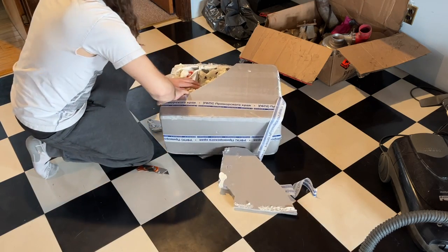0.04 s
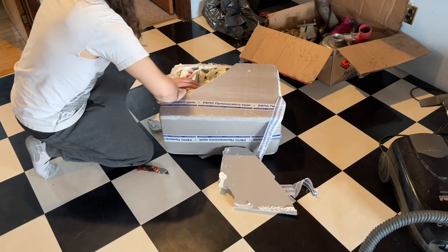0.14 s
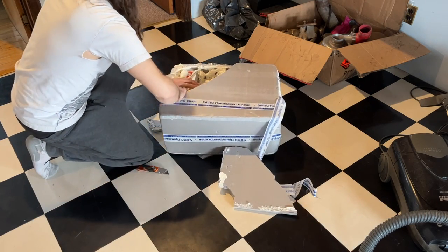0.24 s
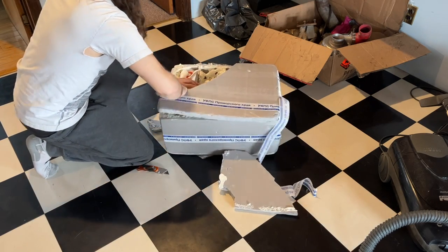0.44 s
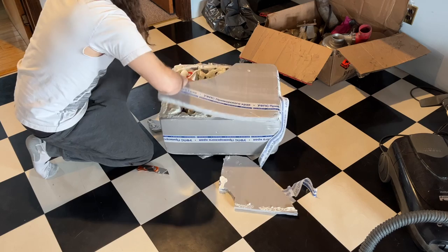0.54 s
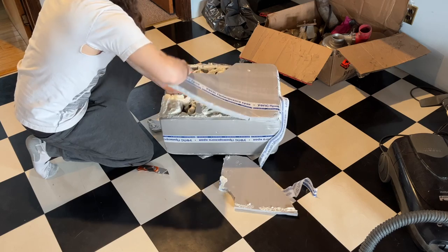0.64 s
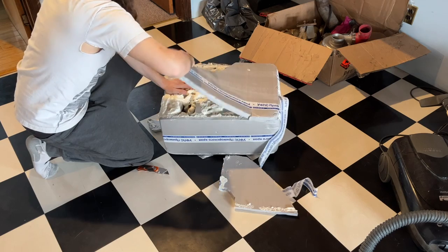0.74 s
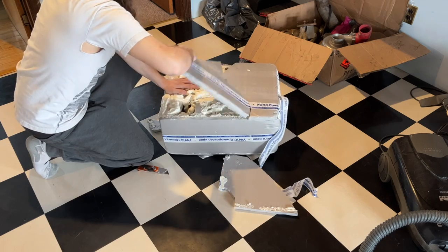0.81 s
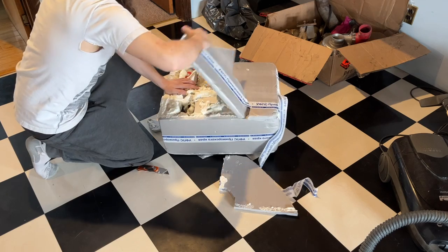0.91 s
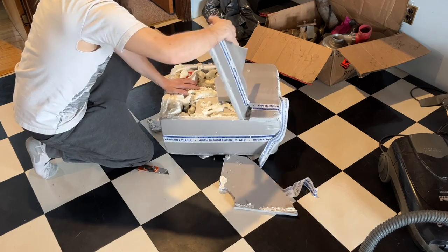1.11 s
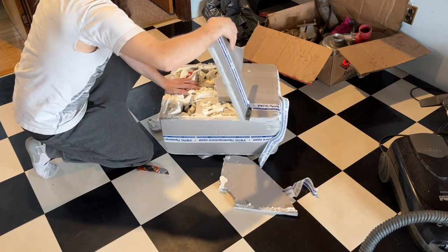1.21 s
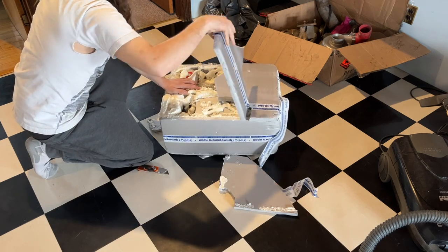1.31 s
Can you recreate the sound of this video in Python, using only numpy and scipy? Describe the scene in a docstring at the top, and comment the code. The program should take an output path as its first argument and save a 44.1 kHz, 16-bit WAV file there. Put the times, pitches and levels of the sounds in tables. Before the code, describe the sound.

Hard packing foam cracking and tearing apart by hand, with creaks and thuds, in a small room

```python
"""Over faint low background noise, a slab of hard packing foam is scuffed, then pried off its block by hand.
It creaks as noise grains, cracks as short noise bursts that ring slab modes, and gives way with a swung thud.
It tears in a run of cracks over clumped bead grains and single pops, and snaps free with a second thud.
Then it rubs, scuffs and squeaks faintly as it is lifted: friction grains, partly through resonances.
A small hard-floored room, made of decaying noise bands and one low mode, rings on after every crack."""
import sys
import numpy as np
from scipy import signal
from scipy.fft import rfft, irfft, next_fast_len
from scipy.io import wavfile

SR = 44100
rng = np.random.default_rng(int(sys.argv[2]) if len(sys.argv) > 2 else 0)


def store_pcm(level_fs):
    """Save levels as 16-bit WAV."""
    pcm = np.round(np.clip(level_fs, -1, 1) * 32767).astype(np.int16)
    wavfile.write(sys.argv[1], SR, np.atleast_2d(pcm).T)


N = 59535
T = np.arange(N) / SR  # s


def amp(db):
    """Decibels to gain."""
    return 10 ** (np.asarray(db) / 20)


def unit(x):
    """Scale to rms 1."""
    return x / np.sqrt(np.mean(x ** 2) + 1e-20)


def level(curve):
    """Gain over time from (t/s, level/dB) points; silent outside them."""
    t_s, db = np.transpose(curve)
    return amp(np.interp(T, t_s, db, left=-np.inf, right=-np.inf))


def colour(x, points):
    """Causal (minimum-phase) filter along (f/Hz, level/dB) points; keeps the power of white noise."""
    size = 2 * next_fast_len(N)
    hz, db = np.transpose(points)
    log_hz = np.log(np.arange(size // 2 + 1) * SR / size + 1)
    gain = amp(np.interp(log_hz, np.log(hz), db))
    cepstrum = irfft(np.log(unit(gain)))
    # fold the cepstrum onto positive time
    cepstrum[1:size // 2] *= 2
    cepstrum[size // 2 + 1:] = 0
    response = np.exp(rfft(cepstrum))
    return irfft(rfft(x, size) * response)[..., :N]


def convolve(x, responses):
    """Play a sound through one impulse response per channel."""
    return np.array([signal.fftconvolve(x, r)[:N] for r in responses])


def ring(x, hz, t60_s):
    """Two-pole resonator: a unit click sets a tone of height 1 ringing."""
    radius = amp(-60 / (t60_s * SR))
    w = 2 * np.pi * hz / SR
    return signal.lfilter([.5, 0, -.5], [1, -2 * radius * np.cos(w), radius ** 2], x + 1e-18)


def resonate(x, hz, q):
    """The part of a sound that a resonance picks out."""
    return signal.lfilter(*signal.iirpeak(hz, q, fs=SR), x + 1e-18)


def swell(start_s, peak_s, sharpness=2):
    """Envelope that starts at start_s, reaches 1 after peak_s and dies away."""
    u = np.maximum(T - start_s, 0) / peak_s
    return (u * np.exp(1 - u)) ** sharpness


def grains(per_s, spread_db):
    """Random clicks of uneven size, rms 1."""
    sizes = amp(spread_db * np.minimum(rng.exponential(1, N), 3))
    signs = rng.choice([-1, 1], N)
    hits = rng.random(N) < per_s / SR
    return unit(sizes * signs * hits)


def clumps(length_s, spread_db):
    """Irregular gain as the foam sticks and gives, rms 1."""
    wander = np.interp(T / length_s, np.arange(N), rng.standard_normal(N))
    return unit(amp(spread_db * wander))


# background spectrum: (f/Hz, level/dB), relative
FLOOR_SPECTRUM = [(20, -16), (50, 6), (75, -1.5), (103, 9), (140, -1.5), (195, 2), (300, -12), (1000, -9),
                  (4000, -67), (16000, -61)]
FLOOR_DB, FLOOR_WIDTH = -52.5, 0.55


def background():
    """Steady coloured noise: one part common to both channels, one part separate in each."""
    air = rng.standard_normal((3, N))
    return amp(FLOOR_DB) * colour(air[0] + FLOOR_WIDTH * air[1:], FLOOR_SPECTRUM)


# room reverberation bands: (f/Hz, t60/s, level/dB, left-right likeness before clipping to -1..1)
ROOM_BANDS = [(60, 0.43, -6, 0.77), (130, 0.31, -3, 1), (315, 0.37, -4, 0.61), (480, 0.33, 0.5, -0.085),
              (1170, 0.45, 0.5, -0.39), (2060, 0.4, -5, -0.087), (4000, 0.44, 2.96, 0.19),
              (7300, 0.27, 1.5, -0.067), (7670, 0.24, 9.5, -1.5), (10300, 0.46, -10, -1.12),
              (13000, 0.32, -8, 1), (14900, .2, -30, -1.2)]
ROOM_GAP_S, ROOM_BUILD_S = 0.00033, 0.0037
BOOM_HZ, BOOM_T60_S, BOOM_DB = 102, 1, -65


def room(x):
    """Diffuse reflections that die band by band, and one low standing wave between the walls."""
    centres_hz, t60s_s, levels_db, likeness = np.transpose(ROOM_BANDS)
    log_hz = np.log(np.fft.rfftfreq(N, 1 / SR) + 1)
    mid, side = rfft(rng.standard_normal((2, N)))
    alike = np.interp(log_hz, np.log(centres_hz), np.clip(likeness, -1, 1))
    noise = np.sqrt((1 + alike) / 2) * mid + np.sqrt((1 - alike) / 2) * side * [[1], [-1]]
    build = np.clip((T - ROOM_GAP_S) / ROOM_BUILD_S, 0, 1)
    response = 0
    for pick, t60_s, db in zip(np.eye(len(ROOM_BANDS)), t60s_s, levels_db):
        decay = build * np.exp(-np.log(1000) * T / t60_s)
        band = irfft(noise * np.interp(log_hz, np.log(centres_hz), pick), N)
        response = response + amp(db) * band * decay / np.sqrt(np.sum(decay ** 2))
    boom = amp(BOOM_DB) * ring(x, BOOM_HZ, BOOM_T60_S)
    return convolve(x, response) + boom


# foam slides on foam: (t/s, level/dB)
SLIDE = [(0, -62.5), (.05, -57), (.105, -54), (.14, -41), (.19, -39), (.4, -74), (.47, -43), (.72, -41),
         (.86, -36), (.97, -47), (1.04, -43.5), (1.09, -63), (1.35, -59.5)]
# scuffs of hand and slab: (t/s, level/dB, dull push level/dB, swell time/s, f/Hz)
SCUFFS = [(0.045, -50, -43, 0.02, 398), (0.93, -40, -64, 0.0074, 2290), (1.11, -48, -72, .015, 2650),
          (1.218, -45.5, -73, .012, 1700), (1.313, -54.5, -53, 0.012, 2000)]
# friction spectrum: (f/Hz, level/dB), relative
RUB_SPECTRUM = [(80, -12), (330, 1.5), (700, 0.5), (1400, 2.5), (2500, -2), (6500, -5), (8500, -19.5),
                (10500, -2), (13500, -7.5), (16000, -21)]
# dull crushing spectrum, for pushes and crunches: (f/Hz, level/dB), relative
CRUNCH_SPECTRUM = [(40, -26), (100, -14), (200, -3.5), (350, 5), (540, -2.5), (720, -5), (1100, -10),
                   (2500, -43.5)]
RUB_SLIPS_PER_S, SCUFF_Q, SCUFF_RESONANCE = 3200, 2, 0.8


def rubbing():
    """Fine friction grains as the slab slides; short scuffs also push dully on the block."""
    slips = grains(RUB_SLIPS_PER_S, spread_db=2.0)
    friction, push = level(SLIDE) * slips, 0
    for t_s, db, push_db, swell_s, hz in SCUFFS:
        envelope = swell(t_s, swell_s)
        scuff = amp(db) * envelope * slips
        friction = friction + scuff + SCUFF_RESONANCE * resonate(scuff, hz, SCUFF_Q)
        push = push + amp(push_db) * envelope
    return colour(friction, RUB_SPECTRUM) + colour(push * rng.standard_normal(N), CRUNCH_SPECTRUM)


SQUEAK_S, SQUEAK_SWELL_S, SQUEAK_DB = 0.94, 0.026, -44.5
SQUEAK_HZ, SQUEAK_Q, SQUEAK_SLIPS_PER_S = 2350, 13, 500


def squeak():
    """The lifted slab squeaks faintly: sparse slips through a narrow resonance."""
    tone = unit(resonate(grains(SQUEAK_SLIPS_PER_S, spread_db=-2), SQUEAK_HZ, SQUEAK_Q))
    return amp(SQUEAK_DB) * swell(SQUEAK_S, SQUEAK_SWELL_S) * tone


# foam creaks under the prying hand: (t/s, level/dB)
PRY = [(.186, -76), (.196, -23.5), (.209, -22), (.222, -17.5), (.255, -26), (.27, -14.5), (.29, -19.5),
       (.318, -28.5), (.335, -26.5), (.37, -61)]
# creak spectrum: (f/Hz, level/dB), relative
CREAK_SPECTRUM = [(60, -61), (170, -12), (320, 2.5), (600, 0), (1000, 2), (1800, -3), (3200, -12.5),
                  (7000, -20.5), (8500, -30), (11000, -15), (14000, -23), (16000, -38)]
CREAK_SLIPS_PER_S, CREAK_CLUMP_S, CREAK_CLUMP_DB = 4500, .004, 1.5


def creaking():
    """Dull, uneven slip grains as the foam sticks and gives under the hand."""
    slips = clumps(CREAK_CLUMP_S, CREAK_CLUMP_DB) * grains(CREAK_SLIPS_PER_S, spread_db=2.5)
    return colour(level(PRY) * slips, CREAK_SPECTRUM)


# the tear runs through the beads: (t/s, level/dB)
TEAR = [(.496, -33), (.508, -30.5), (.53, -23), (.55, -20.5), (.585, -26), (.61, -23.5), (.64, -21),
        (.668, -21.5), (.69, -27), (.745, -64), (.77, -24), (.782, -19.5), (.803, -28), (.83, -33),
        (.865, -32.5), (.91, -51)]
# bead spectrum: (f/Hz, level/dB), relative
BEAD_SPECTRUM = [(40, -24.5), (100, 5), (190, 1), (320, 1.5), (550, -1), (950, 2), (1800, 4), (3500, -10.5),
                 (6800, -15), (8500, -30), (10500, -6.5), (13500, -28), (16000, -39)]
# cavity resonances of the block: (f/Hz, Q, share)
HOLLOW = [(342, 2.1, 0.83), (824, 4.9, 0.4)]
# spectrum of bursting foam, for pops and cracks: (f/Hz, level/dB), relative
SNAP_SPECTRUM = [(200, -9.5), (600, -8), (1500, 3), (3000, 1.5), (6500, -0.5), (9000, -9), (13000, 0),
                 (16000, -12.5)]
BEADS_PER_S, CLUMP_S, CLUMP_DB = 3500, 0.0048, 3.5
POPS_PER_S, POP_DECAY_S, POP_DB, POPS_END_S = 200, 0.00068, -13.5, .7


def tearing():
    """Beads part in clumps over the hollow block; single beads pop between the big cracks."""
    tear = level(TEAR)
    parting = clumps(CLUMP_S, CLUMP_DB) * grains(BEADS_PER_S, spread_db=2.5)
    beads = colour(tear * parting, BEAD_SPECTRUM)
    hollow = sum(share * resonate(beads, hz, q) for hz, q, share in HOLLOW)
    clicks = abs(grains(POPS_PER_S, spread_db=8.5))
    bursts = signal.lfilter([1], [1, -np.exp(-1 / (POP_DECAY_S * SR))], clicks + 1e-18)
    popping = unit(bursts * rng.standard_normal(N))
    pops = colour(amp(POP_DB) * tear * (T < POPS_END_S) * popping, SNAP_SPECTRUM)
    return beads + hollow + pops


# slab crushes against the block: (t/s, level/dB)
CRUNCHES = [(0.259, -32), (.303, -23), (0.7715, -16), (0.817, -37)]
CRUNCH_SWELL_S = 0.013


def crunches():
    """Dull crushing noise where the slab levers against the block."""
    envelope = sum(amp(db) * swell(t_s, CRUNCH_SWELL_S) for t_s, db in CRUNCHES)
    return colour(envelope * rng.standard_normal(N), CRUNCH_SPECTRUM)


# slab and block flex as the tension lets go: (t/s, level/dB, f/Hz at the peak, swell time/s)
THUDS = [(0.219, -17.5, 320, 0.0093), (0.2594, -7.5, 156.6, 0.013), (0.259, -19.5, 63, .028),
         (.303, -11, 350, 0.0065), (0.299, -24, 116, 0.023), (.657, -12, 308, 0.012),
         (.773, -6.5, 193, 0.009), (.774, -11.5, 319, .013), (0.773, -17.5, 114, 0.02),
         (.816, -24.5, 315, 0.0089)]
THUD_SHARPNESS, THUD_SAG = 8, 0.045  # sag: share of pitch lost while swelling


def thuds():
    """Released tension swings the foam for a few cycles that sag in pitch."""
    out = 0
    for t_s, db, hz, peak_s in THUDS:
        pitch_hz = hz * (1 + THUD_SAG * (1 - np.clip((T - t_s) / peak_s, 0, 2)))
        phase = 2 * np.pi * np.cumsum(pitch_hz * (T > t_s)) / SR
        out = out + amp(db) * swell(t_s, peak_s, THUD_SHARPNESS) * np.sin(phase)
    return out


# fractures: (t/s, snap level/dB before SNAP_DB, slab ring level/dB, snap length/s, snap f/Hz)
CRACKS = [(0.2062, -30, -19, 0.0036, 1500), (0.218, -48, -25.5, .008, 1760),
          (0.2606, -17.5, -13, 0.0037, 2150), (0.263, -16, -17.5, .004, 1440),
          (0.2816, -17, -41, 0.0026, 2270), (0.3036, -12, -29, 0.0035, 9800),
          (0.318, -21, -30, 0.012, 2840), (0.4961, -10, -26, 0.0027, 2880),
          (0.5106, -21, -40, 0.0058, 3350), (.5330, -8, -23.5, 0.0011, 3450),
          (0.5444, -19, -25.5, 0.0071, 3550), (0.5715, -12.5, -15, 0.0036, 2930),
          (0.5814, -23, -16.5, 0.0062, 3140), (.6185, -7.5, -11.5, 0.002, 2540),
          (0.6544, -9.5, -21, 0.0023, 6640), (0.7688, -12, -14.5, 0.0025, 6050)]
SNAP_RISE_S, SNAP_DB, SNAP_RESONANCE, SNAP_Q = 0.00049, 0.5, 1.06, 4.5


def snaps():
    """Each crack is a few milliseconds of bursting cell walls, with a pitch of its own."""
    out, cells = 0, rng.choice([-1, 1], N)
    for t_s, db, _, length_s, hz in CRACKS:
        age_s = np.maximum(T - t_s, 0)
        envelope = np.minimum(age_s / SNAP_RISE_S, 1) * np.exp(-(age_s / length_s) ** 2)
        burst = amp(SNAP_DB + db) * envelope * cells
        out = out + burst + SNAP_RESONANCE * resonate(burst, hz, SNAP_Q)
    return colour(out, SNAP_SPECTRUM)


# slab modes, before pitch shift and scatter: (f/Hz, level/dB, t60/s)
SLAB_MODES = [(314, -1.5, 0.034), (440, -6, 0.049), (598, -9, 0.036), (728, -4.5, 0.027), (796, 0, 0.025),
              (884, -8, 0.11), (951, -3.5, 0.043), (1093, -9, 0.044), (1223, -4.5, 0.028),
              (1510, -9, 0.027), (1754, -5, 0.038), (2000, -4, 0.025), (2764, -10, 0.021)]
# slab rings higher as it is bent, lower once free: (t/s, pitch ratio)
SLAB_PITCH = [(.26, 1), (.60, 1.06), (.77, 0.788)]
SLAB_LAG_S, SLAB_DETUNE_RATIO, SLAB_SCATTER_DB = 0.001082, 0.014, 2


def slab_ring():
    """Each crack sets the modes of the bending slab ringing, with random sign, level and detuning."""
    out, blow = np.zeros(N), signal.unit_impulse(SR // 10)
    for t_s, _, ring_db, _, _ in CRACKS:
        start = int((t_s + SLAB_LAG_S) * SR)
        pitch = np.interp(t_s, *np.transpose(SLAB_PITCH))
        for hz, db, t60_s in SLAB_MODES:
            mode_db = ring_db + db + SLAB_SCATTER_DB * rng.standard_normal()
            strength = rng.choice([-1, 1]) * amp(mode_db)
            mode_hz = hz * pitch * (1 + SLAB_DETUNE_RATIO * rng.standard_normal())
            out[start:start + len(blow)] += strength * ring(blow, mode_hz, t60_s)
    return out


THUD_ROOM_DB, RIGHT_LAG_SAMPLES, PAN_DB = -2.5, 0.93, 0.8


def scene():
    """The foam, slightly left of centre, in its room over the background."""
    breaking = snaps() + slab_ring() + crunches() + creaking() + tearing() + rubbing() + squeak()
    flexing = thuds()
    taps = np.arange(17)
    lags = np.array([[0], [RIGHT_LAG_SAMPLES]])
    direct = convolve(breaking + flexing, np.sinc(taps - np.median(taps) - lags))  # fractional delay
    reverb = room(breaking + amp(THUD_ROOM_DB) * flexing)
    return (direct + reverb) * amp([[PAN_DB / 2], [-PAN_DB / 2]]) + background()


CEILING, CUTOFF_HZ = .95, 17200


def record(dry):
    """Peaks rounded below the ceiling, then top cut."""
    x = dry / (1 + (dry / CEILING) ** 4) ** .25
    return signal.sosfilt(signal.cheby2(12, 70, CUTOFF_HZ, fs=SR, output="sos"), x)


dry = scene()
out = record(dry)
store_pcm(out)
```